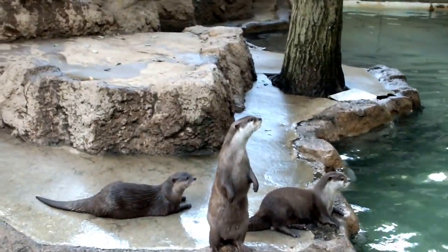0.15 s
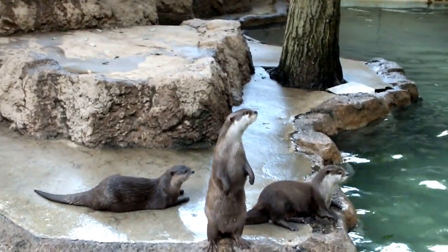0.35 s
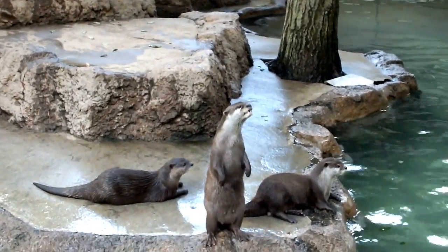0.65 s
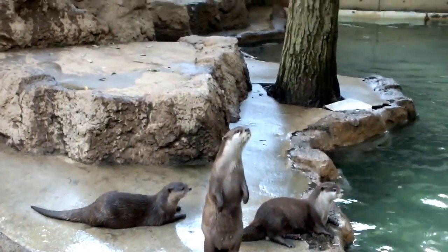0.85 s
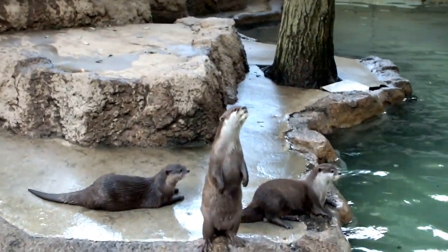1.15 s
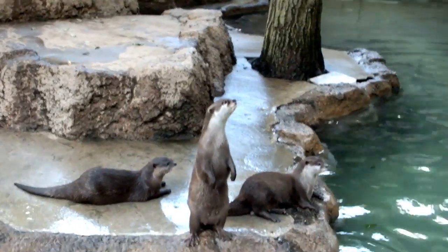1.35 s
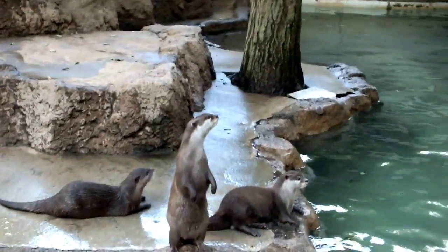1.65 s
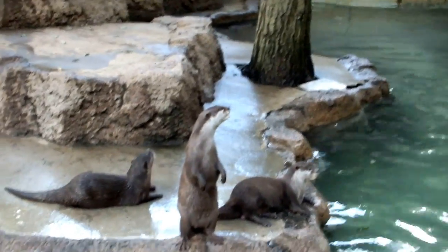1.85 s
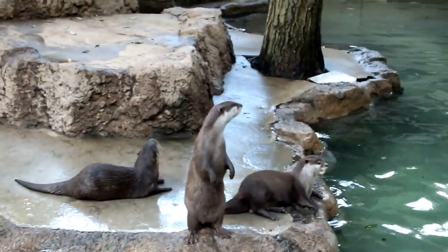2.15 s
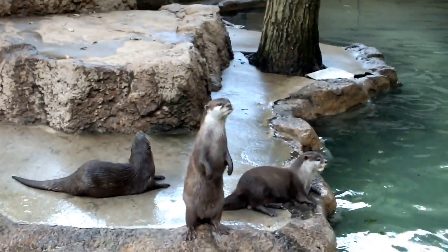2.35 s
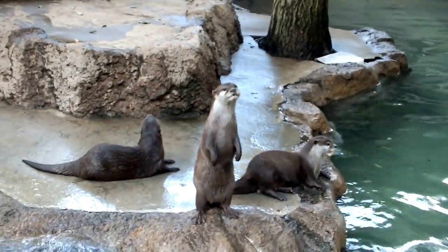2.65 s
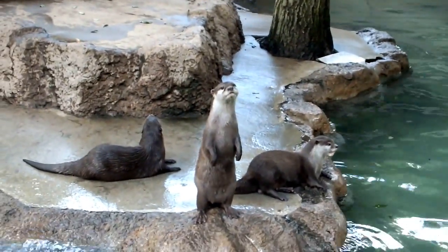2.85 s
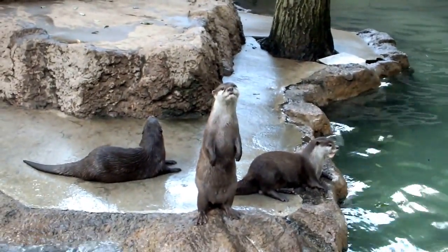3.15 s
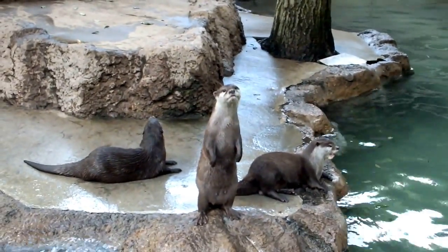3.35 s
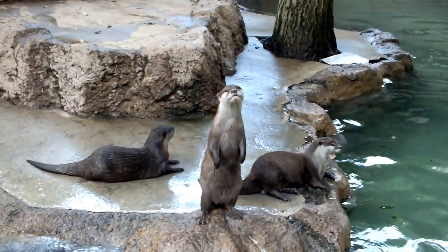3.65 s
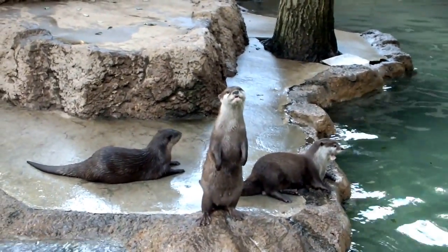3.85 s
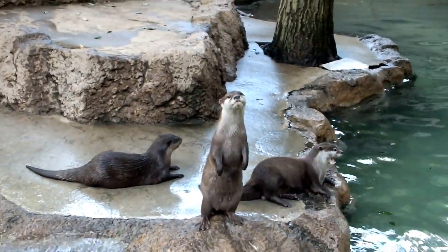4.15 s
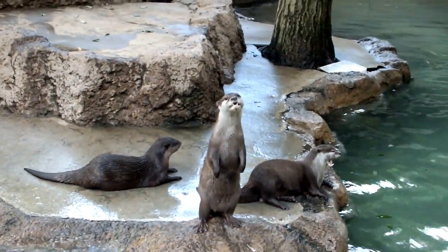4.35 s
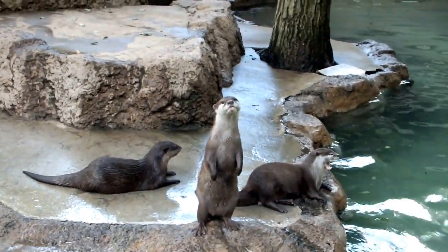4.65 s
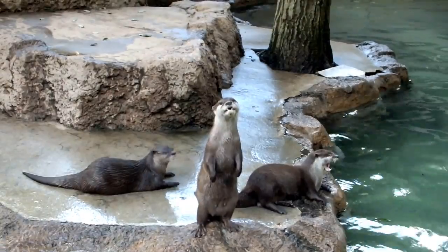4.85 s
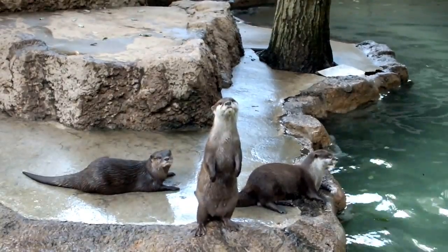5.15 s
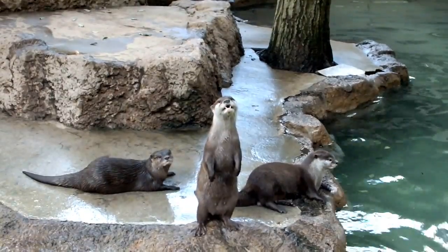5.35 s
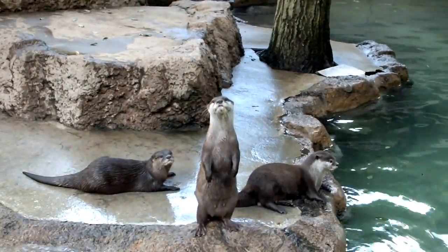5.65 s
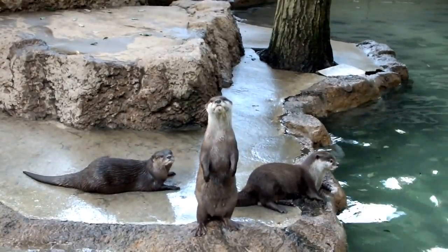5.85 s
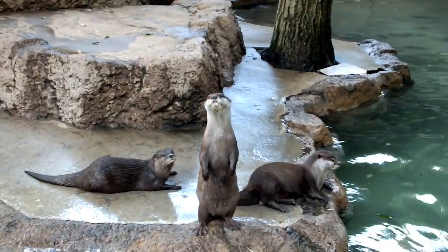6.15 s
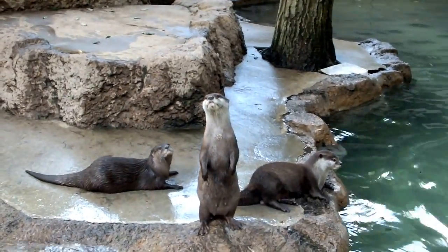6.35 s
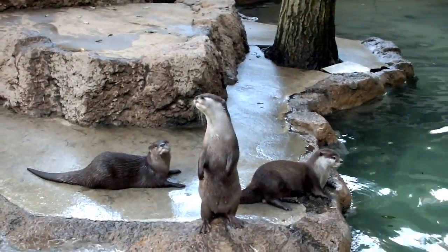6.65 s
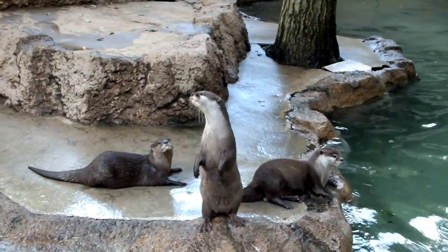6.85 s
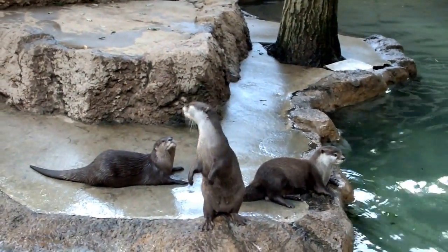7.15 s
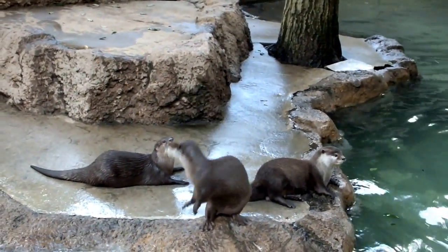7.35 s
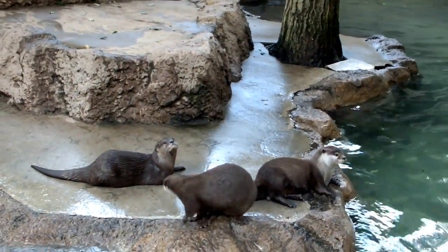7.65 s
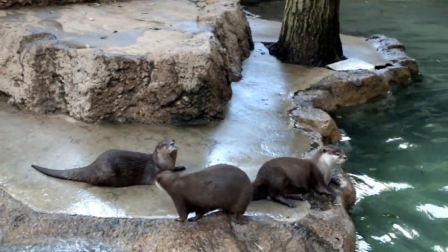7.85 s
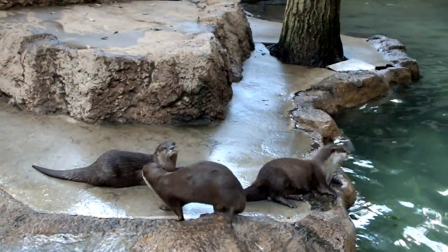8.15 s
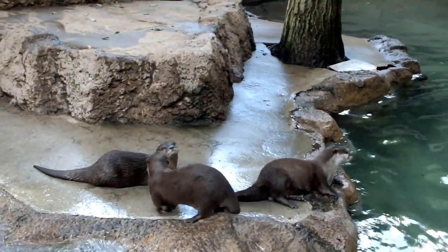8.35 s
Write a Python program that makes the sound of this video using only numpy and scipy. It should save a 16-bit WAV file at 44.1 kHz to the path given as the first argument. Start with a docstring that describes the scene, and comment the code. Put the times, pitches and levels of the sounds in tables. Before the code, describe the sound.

Sharp high otter chirps ring off rock walls above washing, plopping water, mixed with soft peeps and whines, ending in a long quavering call.

```python
"""Water hisses, washes and plops in a pool, and soon otters call: piercing chirps arch, drop and break into a
low tail; softer peeps, nasal whines and a long wavering wail come in between.
Shaped noise makes the running water, and short ringing bubbles make the laps, splashes and drops.
The voices are stacks of overtones on a gliding pitch, coloured by throat resonances; rock walls echo them.
A fast limiter turns everything down under the loud chirps, so the water ducks with them."""
import sys
import numpy as np
from scipy import signal
from scipy.io import wavfile
from scipy.ndimage import uniform_filter1d

SR = 44100
rng = np.random.default_rng(int(sys.argv[2]) if len(sys.argv) > 2 else 0)


def generate_wav(signal):
    """Clip the signal to [-1, 1] and save it as 16-bit WAV at the path in sys.argv[1]."""
    frames = np.transpose(np.atleast_2d(signal))
    scaled = np.clip(frames, -1, 1) * 32767
    pcm = np.round(scaled).astype(np.int16)
    wavfile.write(sys.argv[1], SR, pcm)


N = 375291  # length of the sound in samples

# Levels in these tables are set before the mix, the echoes and the limiter.
# running water, its spectrum before scaling: [f/Hz, level/dB]
WATER_SPECTRUM = [(15, -49), (25, -20.5), (184, -3), (342, -16), (834, -13.5), (1180, -11.5), (2090, -6),
                  (2460, -5.5), (2810, -5), (3990, -4.5), (4570, -4), (6660, -4), (8490, -3.5),
                  (10800, -16.5), (15800, -17.5)]
# how alike the running water is on the left and right: [f/Hz, likeness from -1 to 1]
WATER_LIKENESS = [(60, 0.91), (150, 1), (380, 0.73), (950, 0.46), (2380, -0.025), (5980, -0.12),
                  (15000, 0.18)]
# slow changes of the low wash of the pool: [t/s, boost/dB]
WASH_BOOSTS = [(0, 2), (.5, 11), (1.1, 8), (1.6, 11.5), (2.4, 4), (4.1, 8), (6.7, 3.5), (8.5, 11)]
# surges of the finest spray: [t/s, boost/dB]
SPRAY_SURGES = [(.55, 5.5), (1.55, 5.5), (3.83, 1.5), (4.9, 2.5), (7.721, 1.5), (8.3, 1)]
# water slapping the rocks: [t/s, level/dB, length/s, middle bubble pitch f/Hz]
SPLASHES = [(0.395, -37.5, 0.072, 1006), (1.425, -21, 0.015, 870), (1.463, -31.5, 0.062, 828),
            (1.556, -38.5, 0.16, 739), (1.599, -41, 0.22, 1710), (1.731, -32, 0.089, 668),
            (1.62, -42, 0.25, 211), (2.416, -40, 0.095, 546), (2.678, -40, 0.032, 926),
            (3.794, -39, 0.023, 995), (3.85, -35.5, 0.082, 880), (4.035, -40.5, 0.07, 920),
            (4.046, -42, 0.11, 351), (4.625, -36.5, 0.042, 572), (5.035, -33, 0.045, 714),
            (7.419, -39.5, 0.065, 582), (7.882, -35, 0.055, 503)]
# single drops and wet taps: [t/s, level/dB, pitch f/Hz]
DROPS = [(.985, -17, 1940), (1.434, -25, 835), (1.481, -21, 1160), (1.625, -16.5, 1680),
         (1.67, -18.5, 2130), (1.739, -15, 4280), (1.756, -17.5, 4600), (1.772, -16, 1900),
         (3.342, -26.5, 586), (4.087, -19.5, 2000), (5.047, -18.5, 770), (6.382, -19.5, 7000),
         (7.674, -19.5, 1376)]
# chirps and their tails: [start t/s, length/s, rise/s, fall/s, start f/Hz, top f/Hz, f it falls towards/Hz,
# level/dB, f after the break/Hz, level after the break/dB, level at rest/dB, tail length/s]
CHIRPS = [(.648, 0.086, 0.025, 0.075, 4680, 4585, 800, 0, 1365, -28, -24, 0.071),
          (1.16, 0.063, 0.021, 0.046, 4070, 4270, 970, -1, 1285, -22.5, -26, 0.057),
          (1.831, 0.051, 0.021, .021, 4200, 4210, 2190, 0.5, 1620, -1, -32, 0.05),
          (2.241, 0.089, 0.017, 0.079, 3920, 4280, 1414, -6.5, 1320, -19, -30.5, 0.1),
          (3.016, .07, .031, 0.043, 3435, 4170, 780, -3, 1172, -23, -24, 0.14),
          (3.467, 0.06, .022, 0.02, 3810, 4140, 2530, 1.5, 1510, -9, -27, 0.215),
          (4.381, 0.082, .032, 0.062, 3754, 4330, 776, -2, 1370, -33, -26, 0.083),
          (4.873, 0.086, 0.027, .068, 3950, 4318, 818, -1.5, 1310, -29, -30, .07),
          (5.386, .096, .029, .077, 4295, 4493, 840, 0, 1488, -15, -28, 0.084),
          (5.964, 0.07, .033, 0.043, 3400, 4130, 800, -3, 1410, -30, -29, 0.077),
          (6.566, 0.083, 0.021, 0.024, 4360, 4425, 2953, -2, 1380, -22, -30, .07),
          (7.045, 0.099, .028, 0.085, 4240, 4363, 805, -3.5, 1187, -29, -35, 0.087),
          (7.79, 0.06, 0.017, .031, 3350, 3886, 1380, -7, 1120, -32, -36, 0.027)]
# squeaks that sweep up just before a chirp: [start t/s, length/s, from f/Hz, to f/Hz, level/dB]
UPSWEEPS = [(1.13, 0.016, 1260, 3230, -26.5), (2.209, 0.027, 1047, 2090, -25.5),
            (2.992, 0.027, 1114, 3650, -15), (4.353, 0.023, 1446, 3530, -25.5),
            (5.935, .036, 1063, 3620, -16), (7.758, 0.033, 1930, 3480, -25)]
# softer calls of animals facing away: [start t/s, length/s, from f/Hz, to f/Hz, level/dB]
PEEPS = [(1.544, 0.088, 4510, 2620, -20.5), (2.634, .11, 4750, 3520, -23.5),
         (5.146, 0.11, 2230, 2770, -33.5), (6.386, 0.12, 2170, 2900, -37.5),
         (7.026, .04, 3490, 2475, -14.5)]
# nasal whines, one list of points for each: [t/s, pitch f/Hz, level/dB]
WHINES = [
    [(2.44, 811, -33.5), (2.514, 804, -19), (2.54, 746, -16), (2.624, 752, -19), (2.654, 757, -15.5),
     (2.794, 795.9, -23.5), (2.82, 792, -33)],
    [(3.74, 801, -31), (3.77, 798, -18.5), (3.88, 804.5, -16.5), (3.99, 776, -13.5), (4.052, 814, -19),
     (4.065, 780, -24)],
    [(7.22, 820, -33), (7.27, 778, -16.5), (7.288, 723, -19), (7.338, 729, -21.5), (7.384, 739, -13.5),
     (7.428, 705, -21.5), (7.516, 738, -26), (7.58, 715, -33.5)],
]
# the long wavering call: [t/s, pitch f/Hz, level/dB]
WAIL = [(7.88, 627, -27.5), (7.938, 601, -25), (7.95, 572, -27.5), (8.038, 575, -23), (8.094, 559, -18.5),
        (8.114, 504, -24), (8.142, 564, -18.5), (8.176, 551.4, -23), (8.32, 587.4, -21),
        (8.352, 546.6, -23.5), (8.42, 601.7, -19.5), (8.438, 533, -27), (8.46, 563, -21), (8.51, 557, -24)]
# how the throat passes overtones when the mouth is wide open: [f/Hz, level/dB]
OPEN_THROAT = [(900, -5), (1500, -13), (2200, -7.5), (3100, 8), (4200, -2.5), (5200, -1.5), (7500, -9.5),
               (8800, -17), (10500, -21), (14000, -35)]
# how the throat passes overtones in a chirp's tail: [f/Hz, level/dB]
TAIL_THROAT = [(800, -11), (970, -1.5), (1300, -17.5), (1700, -2.5), (2400, 6), (3200, 14.5), (4000, 13),
               (4800, 4), (5800, 0), (7400, -0.5), (8800, -32.5), (11000, -41)]
# how the throat passes overtones in the low part of most other calls: [f/Hz, level/dB]
WHINE_THROAT = [(750, -37.5), (970, -5), (1250, -22.5), (1600, -14), (2350, 4.5), (3150, 12.5), (4000, 7.5),
                (4700, -3), (5500, -8.5), (6300, 5.5), (7400, -7.5), (10000, -47)]
# how the throat passes overtones in the wail: [f/Hz, level/dB]
WAIL_THROAT = [(560, -14.5), (1130, -10), (1700, -6.5), (2250, -5.5), (2850, 2.5), (3300, 0.5),
               (3850, -0.5), (4500, -12.5), (5500, -21), (7000, -12), (10000, -33)]
# bounces off the ledge and rock walls: [delay t/s, level/dB before each voice's own offset]
ECHOES = [(.0032, -12), (0.01, -17), (0.026, -19), (.053, -27)]
# how long the walls ring: [f/Hz, time to fade by 60 dB t/s]
RING_TIMES = [(200, 0.26), (1000, 0.15), (3000, 0.49), (4500, 0.45), (8000, 0.24), (14000, 0.067)]

WATER_DB = -32  # average level before the small left and right offsets
SPRAY_DB, SURGE_S = 1.5, 0.21  # treble boost between surges; half the length of a surge
EDGE_HZ = 15850  # top of the sound band
ATTACK_DB, ATTACK_S = -19, 0.01  # a chirp starts this far down and swells
SAG_DB_PER_OCT = 14  # a chirp weakens as its pitch leaves the top
WEAK_HZ, WEAK_DB_PER_OCT = 2840, 15  # extra weakening below this pitch
FALTER_DB, FALTER_PER_S = 5, 130  # depth and changes a second of the unsteady level in a chirp's drop
WOBBLE, WOBBLE_PER_S = .022, 45  # share of the pitch and changes a second, after the break
REST_HZ, SLIDE_S, TAIL_RELEASE_S = 814, .04, 0.008  # resting pitch; times to slide there and to let go
GLIDE_BEND = 1.9  # above 1, a sweep starts slowly and speeds up
WHINE_SOFT_DB = 11  # dB per octave that a quiet whine loses of its overtones


def amp(db):
    """Turn decibels into a plain multiplier."""
    return 10 ** (np.asarray(db) / 20)


def evened(x):
    """Scale a signal to an average (rms) level of one."""
    return x / np.sqrt(np.mean(x ** 2) + 1e-20)


def read(points, hz):
    """Read a curve joined by straight lines on a log-frequency axis."""
    f, value = np.transpose(points)
    return np.interp(np.log(hz + 1), np.log(f + 1), value)


def add(mix, s, sound):
    """Add a sound to the mix at s seconds, cutting off what runs past the end."""
    part = mix[max(round(s * SR), 0):][:len(sound)]
    part += sound[:len(part)]


def tremor(t, hz):
    """Random wavering: straight lines between chance values, hz of them a second."""
    knots = rng.standard_normal(4096)
    return np.interp(t * hz % 4095, np.arange(4096), knots)


def water(sizzle_db=4, sizzle_hz=8500, sizzle_width_hz=700):
    """Running water: noise shaped into a lumpy low wash under a smooth hiss with a bright sizzle."""
    frames, hz = N // 256 + 5, np.fft.rfftfreq(1024, 1 / SR)
    t = np.arange(frames)[:, None] * 256 / SR
    a, b, c, d, patches = rng.standard_normal((5, frames, len(hz)))
    # neighbouring times and pitches swell together, so the noise is patchy
    patches = uniform_filter1d(patches, size=10, axis=0)
    patches = evened(uniform_filter1d(patches, size=9, axis=1))
    low = hz / (hz + 80) / (1 + (hz / 1800) ** 2)
    high = 1 / (1 + (9500 / (hz + 1)) ** 6)
    spray_db = SPRAY_DB + sum(db * np.exp(-((t - s) / SURGE_S) ** 2) for s, db in SPRAY_SURGES)
    field_db = read(WATER_SPECTRUM, hz) + sizzle_db * np.exp(-((hz - sizzle_hz) / sizzle_width_hz) ** 2)
    field_db = field_db + low * np.interp(t, *np.transpose(WASH_BOOSTS)) + high * spray_db
    field_db = field_db + patches * (low * 2.2 + (1 - low) * 1.4)
    # the right side shares part of the left side's noise
    same = np.clip(read(WATER_LIKENESS, hz), -1, 1)
    left = a + 1j * b
    right = same * left + np.sqrt(1 - same ** 2) * (c + 1j * d)
    spectrum = np.array([left, right]) * amp(field_db)
    hiss = signal.istft(spectrum.transpose(0, 2, 1), nperseg=1024, noverlap=768)[1][:, :N]
    return amp(WATER_DB) * amp([[.6], [1.8]]) * evened(hiss)


def bubble(hz, cycles, rise):
    """A pocket of air rings briefly, its pitch rising as it surfaces."""
    t = np.arange(3000) / SR
    age = t * hz / cycles
    turns = hz * np.cumsum(1 + rise * np.minimum(age, 4)) / SR
    return np.exp(-age) * np.sin(2 * np.pi * turns)


def lapping(count=320):
    """Small bubbles ring at random times and places all round the edge of the pool."""
    out = np.zeros((2, N))
    for when, pitch, size, side in rng.random((count, 4)):
        plip = amp(-27 - 34 * size) * bubble(480 * 5 ** pitch, cycles=9.7, rise=0.065)
        add(out[0], when * N / SR, np.sqrt(1 - side) * plip)
        add(out[1], when * N / SR, np.sqrt(side) * plip)
    return out


def splash(length, hz):
    """A slap of water is a crowd of 60 bubbles of scattered pitch and loudness."""
    crowd = np.zeros(SR // 3)
    for when, spread, size in rng.random((60, 3)):
        octaves = .42 * np.log((spread + .03) / (1.03 - spread))
        strength = amp(-14 * size) * np.sin(np.pi * spread)  # pitches far from the middle are weaker
        add(crowd, when * length, strength * bubble(hz * 2 ** octaves, cycles=7.2, rise=0.041))
    return crowd / np.sqrt((crowd ** 2).sum() / (length * SR))


def drop(hz):
    """A drop is one bubble and a tick of noise, stronger the higher the bubble's pitch."""
    tick = rng.standard_normal(3000) * np.exp(-np.arange(3000) / (0.0029 * SR))
    return bubble(hz, cycles=2.2, rise=0.02) + tick * hz / 10000


def splashes():
    """Slaps and drops of water ring at their listed times, with the deepest bass filtered out."""
    out = np.zeros(N)
    for s, db, length, hz in SPLASHES:
        add(out, s, amp(db) * splash(length, hz))
    for s, db, hz in DROPS:
        add(out, s, amp(db) * drop(hz))
    return signal.sosfilt(signal.butter(2, 230, "high", fs=SR, output="sos"), out)


def call(rows, throat, jitter, drift_db, flutter_hz, rasp, soft_db=0):
    """Vocal folds on a gliding pitch; each overtone swells as it crosses a throat resonance."""
    s, pitch, level = np.transpose(rows)
    t = np.arange(s.min(), s.max(), 1 / SR)
    hz = np.exp(uniform_filter1d(np.interp(t, s, np.log(pitch)), size=300, mode="nearest"))
    effort_db = np.interp(t, s, level)
    unsteady_hz = hz * (1 + jitter * tremor(t, flutter_hz) + rasp * tremor(t, 900))
    phase = 2 * np.pi * np.cumsum(unsteady_hz) / SR
    k = np.arange(1, 19)[:, None]  # overtone numbers
    gape = np.clip(np.log2(hz / 1100), 0, 1)  # the mouth opens wide as the pitch climbs
    shape_db = (1 - gape) * read(throat, k * hz) + gape * read(OPEN_THROAT, k * hz)
    # a starting or quiet voice has weaker overtones
    quiet = np.clip((-11 - effort_db) / 10, 0, 1)
    starting = np.exp(-((t - t[0]) / 0.035) ** 2)
    shape_db = shape_db - soft_db * np.log2(k) * np.maximum(quiet, starting)
    # tongue and lips keep shifting the colour
    weights = amp(shape_db + drift_db * tremor(t + 5 * k, 22)) * (k * hz < EDGE_HZ)
    voice = (weights * np.sin(k * phase)).sum(0) / np.sqrt((weights ** 2).sum(0) / 2)
    edges = np.clip(np.minimum((t - t[0]) / .003, (t[-1] - t) / .004), 0, 1)
    return t[0], voice * edges * amp(effort_db)


def chirp(start, length, rise, fall, start_hz, top_hz, low_hz, db):
    """The pitch rounds off at its top, then drops while the voice falters; rows of [t/s, f/Hz, level/dB]."""
    t = np.linspace(0, length, 100)
    climb = top_hz - (top_hz - start_hz) * (1 - t / rise) ** 2
    descent = low_hz + (top_hz - low_hz) * np.exp(-((t - rise) / fall) ** 2)
    hz = np.where(t < rise, climb, descent)
    sag_db = SAG_DB_PER_OCT * np.log2(top_hz / hz)
    weak_db = WEAK_DB_PER_OCT * np.maximum(np.log2(WEAK_HZ / hz), 0)
    falter_db = FALTER_DB * np.clip((t - rise) / rise, 0, 1) * tremor(t, FALTER_PER_S)
    attack_db = ATTACK_DB * np.exp(-t / ATTACK_S)
    return np.transpose([start + t, hz, db + attack_db - sag_db - weak_db + falter_db])


def slide(start, length, break_hz, break_db, rest_db):
    """After the break, pitch and effort relax together and steady; rows of [t/s, f/Hz, level/dB]."""
    t = np.linspace(0, length, 100)
    tension = np.exp(-t / SLIDE_S)
    unsteady = np.sqrt(tension)
    hz = (REST_HZ + (break_hz - REST_HZ) * tension) * (1 + WOBBLE * unsteady * tremor(t, WOBBLE_PER_S))
    release_db = -10 * np.exp((t - length) / TAIL_RELEASE_S)
    db = rest_db + (break_db - rest_db) * tension + release_db
    return np.transpose([start + t, hz, db + .5 * FALTER_DB * unsteady * tremor(t, FALTER_PER_S)])


def glide(start, length, from_hz, to_hz, db, crest, ends_db):
    """One quickening sweep, loudest at the share crest of its length; rows of [t/s, f/Hz, level/dB]."""
    u = np.linspace(0, 1, 50)
    swell_db = ends_db * ((u - crest) / crest) ** 2
    hz = from_hz * (to_hz / from_hz) ** (u ** GLIDE_BEND)
    return np.transpose([start + u * length, hz, db + swell_db])


def chirping():
    """Clean arching chirps break into low tails; some follow a squeak that sweeps upwards."""
    out = np.zeros(N)
    for start, length, *arch, break_hz, break_db, rest_db, tail_s in CHIRPS:
        arching = chirp(start, length, *arch)
        add(out, *call(arching, WHINE_THROAT, jitter=.007, drift_db=1.5, flutter_hz=140, rasp=.002, soft_db=7))
        tail = slide(start + length, tail_s, break_hz, break_db, rest_db)
        add(out, *call(tail, TAIL_THROAT, jitter=.005, drift_db=1.5, flutter_hz=120, rasp=.002))
    for row in UPSWEEPS:
        sweep = glide(*row, crest=1.0, ends_db=-15.5)
        add(out, *call(sweep, WHINE_THROAT, jitter=.015, drift_db=2, flutter_hz=250, rasp=.008, soft_db=12))
    return out


def facing_away():
    """Animals facing away give short gliding peeps and one hoarser, wavering wail."""
    out = np.zeros(N)
    for row in PEEPS:
        sweep = glide(*row, crest=0.53, ends_db=-15)
        add(out, *call(sweep, WHINE_THROAT, jitter=.012, drift_db=2, flutter_hz=150, rasp=.008, soft_db=8))
    add(out, *call(WAIL, WAIL_THROAT, jitter=.012, drift_db=5, flutter_hz=80, rasp=.014))
    return out


def whining():
    """Nasal whines hold a fairly steady low pitch, rich in overtones."""
    out = np.zeros(N)
    for rows in WHINES:
        add(out, *call(rows, WHINE_THROAT, jitter=.006, drift_db=1.5, flutter_hz=45, rasp=.002,
                       soft_db=WHINE_SOFT_DB))
    return out


def enclosure(x, wet_db, echo_db):
    """Direct sound, a few bounces off stone that reach each ear a little apart, and a diffuse tail."""
    taps = rng.standard_normal((2, SR)) * (rng.random((2, SR)) < .04)
    taps[1] = 0.15 * taps[0] + 0.83 * taps[1]
    hz, t, z = signal.stft(taps, SR, nperseg=256)
    fade = amp(-60 * t / read(RING_TIMES, hz)[:, None])
    z = z * fade * np.minimum(t / 0.04, 1)  # the tail builds up before it dies away
    tail = signal.istft(z, SR, nperseg=256)[1]
    response = amp(wet_db) * tail / np.linalg.norm(tail[0])
    response[:, 0] += 1  # the direct sound
    for (delay, db), skew in zip(ECHOES, rng.uniform(-.0001, .0001, len(ECHOES))):
        add(response[0], delay, amp([db + echo_db]))
        add(response[1], delay + skew, amp([db + echo_db]))
    return signal.fftconvolve(x[None], response, axes=1)[:, :N]


def scene():
    """The otters and the pool between stone walls."""
    pool = water() + lapping() + enclosure(splashes(), wet_db=-3, echo_db=-38)
    voices = enclosure(chirping(), wet_db=-18, echo_db=3.5)
    voices = voices + amp(-2) * enclosure(facing_away(), wet_db=-8.5, echo_db=-4)
    voices = voices + amp(-2.5) * enclosure(whining(), wet_db=-16, echo_db=-69)
    return voices * amp(0) * np.array([[amp(-1)], [amp(1)]]) + pool  # voices lean to the right


def record(dry, ceiling_db=-18.0, recovery_db_per_s=450, squeeze=0.81):
    """A fast limiter holds loud moments down and soon lets go; then the top of the band is cut."""
    power_db = 10 * np.log10(abs(uniform_filter1d((dry ** 2).mean(0), size=100)) + 1e-12)
    fall = np.arange(N) * recovery_db_per_s / SR
    held_peak_db = np.maximum.accumulate(power_db + fall) - fall  # peaks fade at the recovery speed
    over_db = np.maximum(held_peak_db - ceiling_db, 0)
    held = dry / amp(squeeze * signal.lfilter(np.ones(100) / 100, 1, over_db))
    low_pass = signal.firwin(511, EDGE_HZ, window=("kaiser", 9), fs=SR)
    return signal.oaconvolve(held, low_pass[None], "same")


dry = scene()
out = record(dry)
generate_wav(out)
```